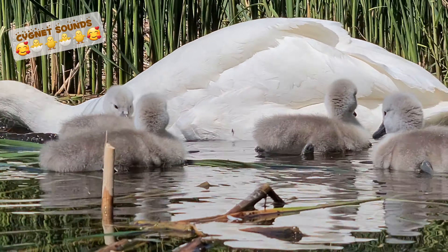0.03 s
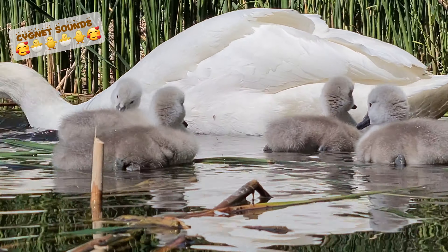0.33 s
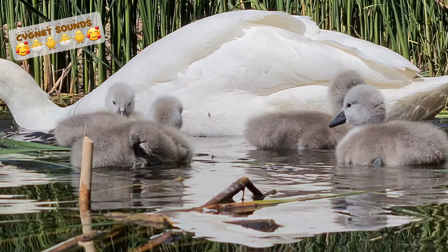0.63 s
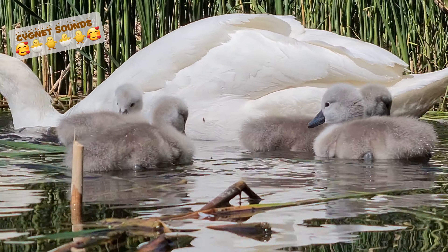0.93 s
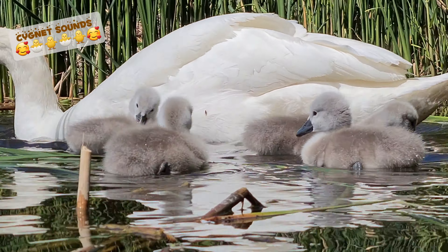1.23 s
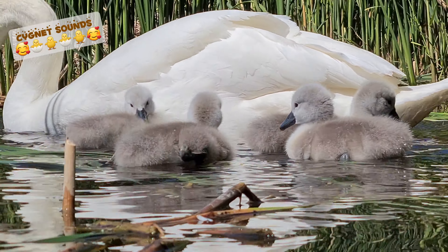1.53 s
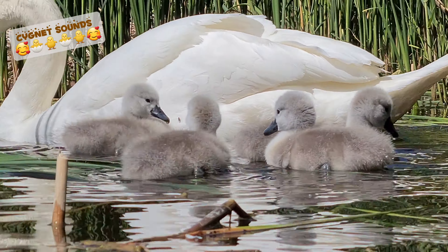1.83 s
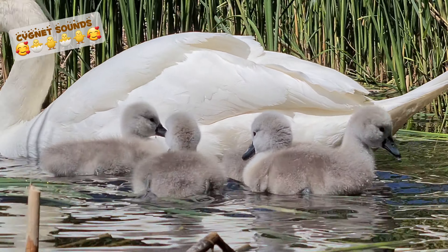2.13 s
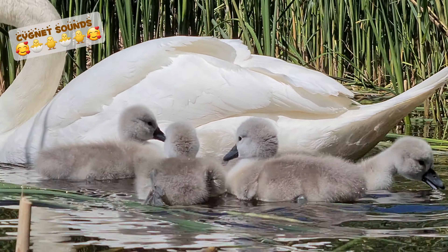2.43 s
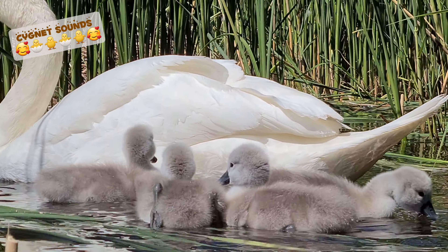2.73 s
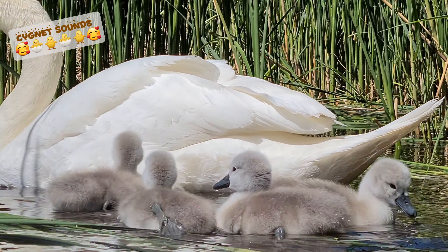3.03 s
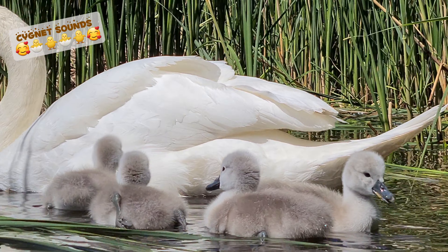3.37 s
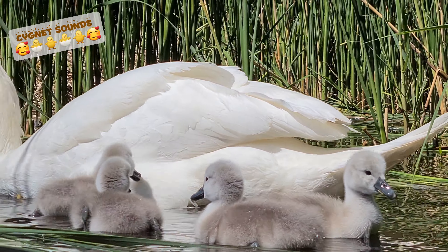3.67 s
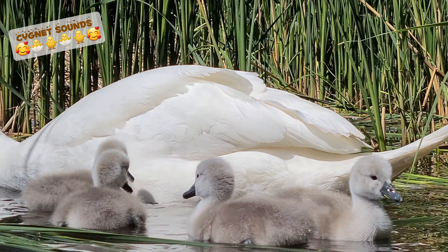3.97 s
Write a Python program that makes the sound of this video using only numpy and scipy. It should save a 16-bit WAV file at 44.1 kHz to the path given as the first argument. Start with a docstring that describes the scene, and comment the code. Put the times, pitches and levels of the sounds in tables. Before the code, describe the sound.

Cygnets paddle with light splashes and drips, then peep a few times over a low rumble.

```python
"""A deep outdoor rumble and a soft breeze hang over a reedy pond, where cygnets paddle.
A far bird repeats a falling note, heard only as echoes. Each foot stroke sloshes the water and
throws spray, droplets tick on the surface and small air bubbles ring; midway a foot splashes.
Near the end the chicks give a few short, whistled peeps. Reeds and banks scatter the near sounds."""
import sys
import numpy as np
from scipy import signal
from scipy.fft import rfft, irfft, next_fast_len
from scipy.io import wavfile
from scipy.ndimage import uniform_filter1d, map_coordinates

SR = 44100
rng = np.random.default_rng(int(sys.argv[2]) if len(sys.argv) > 2 else 0)


def digitize_waveform(pressure):
    """Quantize a signal to 16-bit integers and store it at the path in sys.argv[1].

    Rows of a 2-D input are taken as channels; values are limited to [-1, 1].
    """
    field = np.atleast_2d(pressure).T
    bounded = np.clip(field, -1, 1)
    quanta = np.round(bounded * 32767).astype(np.int16)
    wavfile.write(sys.argv[1], SR, quanta)


N = 176400

# stereo image of the water noises: freq_hz, correlation
WATER_CORRELATION = [(500, 0.9), (2000, 0.25), (4500, -0.66), (8000, -0.2), (13000, -0.42)]
WATER_LEFT_DB, BUBBLE_ATTACK_S, REEDS_T60_S = 6, 0.00034, 0.28


def amp(db):
    """Decibels to gain."""
    return 10 ** (np.asarray(db) / 20)


def unit(x):
    """Scale to rms 1."""
    return x / np.sqrt(np.mean(x ** 2) + 1e-20)


def clock():
    """The time of every sample, in seconds."""
    return np.arange(N) / SR


def along(points, hz):
    """Read (freq_hz, value) points on a log frequency axis."""
    freqs, values = np.transpose(points)
    return np.interp(np.log(hz + 1), np.log(freqs + 1), values)


def wobble(rate_hz, size=N):
    """A smooth random curve through rate_hz knots a second."""
    knots = rng.standard_normal(size // 4 + 4)[:int(size * rate_hz / SR) + 4]
    return map_coordinates(knots, [np.arange(size) * rate_hz / SR], mode="mirror")


def filtered(x, response):
    """Zero-phase EQ; response gives the gain at each frequency."""
    size = next_fast_len(N + SR // 2)
    return irfft(rfft(x, size) * response(np.fft.rfftfreq(size, 1 / SR)), size)[..., :N]


def noise(spectrum, correlation):
    """Coloured stereo noise of rms 1, its width set by the left-right correlation."""
    def mid_side_gains(hz):
        angle = np.arccos(np.clip(along(correlation, hz), -1, 1)) / 2
        return amp(along(spectrum, hz)) * [np.cos(angle), np.sin(angle)]
    mid, side = filtered(rng.standard_normal((2, N)), mid_side_gains)
    return unit(np.array([mid + side, mid - side]))


def pan(left_db):
    """Channel gains that put the left left_db above the right."""
    return amp(np.array([[left_db], [-left_db]]) / 2)


def fade(t, t60):
    """Exponential decay from t = 0, silent before."""
    return (t >= 0) * np.exp(-np.log(1000) * np.abs(t) / t60)


def echo(x, t60):
    """Diffuse scatter from reeds and banks, different on each side."""
    tail = rng.standard_normal((2, SR // 2)) * fade(np.arange(SR // 2) / SR, t60)
    return signal.fftconvolve(x[None], tail / np.linalg.norm(tail[0]), axes=1)[:, :N]


def rumble(evenness=0.92, drone_db=-42):
    """A deep, nearly mono rumble that swells and sinks around a steadier drone."""
    # tone of the rumble and of the drone: freq_hz, gain_db
    rumble_spectrum = [(20, -27), (31, -21.5), (37, -16.5), (44, -2.5), (54, 3), (62, -11.5), (75, -14),
                       (100, -40.5), (200, -97.5)]
    drone_spectrum = [(45, -42.5), (65, -2.5), (80, -3), (94, 2), (110, -4), (135, -11), (160, -11),
                      (200, -21), (300, -37.5), (600, -73)]
    # stereo image of both: freq_hz, correlation
    correlation = [(50, 1), (100, 0.99), (200, 0.98)]
    # swells and dips of the rumble: time_s, level_db
    swells = [(0.0, -33.5), (0.12, -34.5), (0.17, -42), (0.19, -33), (0.43, -33.5), (0.47, -46),
              (0.53, -30.5), (0.97, -35.5), (1.06, -27), (1.27, -38.5), (1.45, -31.5), (1.51, -47),
              (1.59, -25.5), (1.64, -39.5), (2.37, -27.5), (2.53, -40.5), (2.6, -29), (2.66, -29),
              (2.7, -44), (2.92, -28.5), (3.05, -41), (3.11, -30.5), (3.2, -37.5), (3.64, -27.5),
              (3.71, -35.5), (3.75, -23), (3.81, -38.5), (3.84, -28.5), (3.95, -35), (4.0, -44)]
    low = noise(rumble_spectrum, correlation)
    envelope = np.sqrt(np.abs(uniform_filter1d(low[0] ** 2, size=2600)) + 1e-6)
    levelled = unit(low / envelope ** evenness)  # irons out the noise's own surges
    deep = levelled * amp(np.interp(clock(), *np.transpose(swells)))
    return deep + amp(drone_db) * noise(drone_spectrum, correlation)


def breeze(level_db=-51, left_db=0.56):
    """Soft, nearly steady air over the pond."""
    # tone of the air: freq_hz, gain_db
    spectrum = [(30, -33), (150, 3), (260, 3), (400, -2), (650, 0.5), (850, -1.5), (1100, 2), (1500, -7),
                (2000, -10), (2500, -17), (3500, -21.5), (4600, -28.5), (5800, -36.5), (7200, -35.5),
                (8200, -47), (10500, -42), (12000, -38), (15500, -44)]
    # its stereo image: freq_hz, correlation
    correlation = [(100, 0.48), (250, 0.84), (500, 0.29), (1000, -0.36), (1500, -0.42), (2200, 0.078),
                   (4000, -0.14), (8000, -0.21), (14000, -0.19)]
    # one gentle swell: time_s, gain_db
    swell = [(0, 1), (.8, 1.04), (1.5, 0.5), (2.1, 3.5), (2.6, 0), (3.3, 0), (4, -0.7)]
    level = amp(level_db + np.interp(clock(), *np.transpose(swell)))
    return noise(spectrum, correlation) * level * pan(left_db)


def paddling(slosh_grain_db=2.5, spray_grain_db=6, gurgle_db=-8, slosh_left_db=4.0):
    """Each foot stroke pushes gurgling water aside and throws grainy spray and fine mist."""
    # foot strokes, rising and falling tenfold: peak_s, rise_s, fall_s, slosh_db, spray_db, mist_db
    strokes = [(.25, 0.52, 0.17, -71.5, -77, -87.5), (0.498, 0.084, 0.17, -71.5, -70.5, -78.5),
               (1.08, 0.024, 0.042, -63, -76, -82), (1.415, 0.11, 0.21, -59.5, -78, -69),
               (1.81, 0.23, 0.26, -65, -71.5, -77), (1.925, 0.013, 0.024, -48.5, -52.5, -52.5),
               (1.981, 0.076, 0.044, -50.5, -58, -57), (2.202, 0.15, 0.18, -56.5, -78, -73.5),
               (2.591, 0.13, .12, -63, -68, -74), (3.22, 0.014, 0.039, -56.5, -80, -70.5),
               (3.67, 0.024, 0.046, -57.5, -74.5, -83)]
    # tone of the three layers, dark to bright: freq_hz, gain_db
    slosh_spectrum = [(200, -12.5), (600, 12), (1200, 10.5), (1900, 4.5), (3300, 9), (4800, -18.5),
                      (6000, -37.5), (12000, -14)]
    spray_spectrum = [(300, -25.5), (1500, -10.5), (3000, 3), (5000, 4.5), (6000, 1), (7300, 2),
                      (8500, -7.5), (10000, -4), (12000, -16.5), (15500, -26)]
    mist_spectrum = [(5000, -26.5), (8000, -13.5), (10000, 1), (11000, -5.5), (14000, -7), (15700, 1)]

    def grainy(spectrum, depth_db, rate_hz):
        return noise(spectrum, WATER_CORRELATION) * amp(depth_db * wobble(rate_hz))

    t, levels = clock(), np.zeros((3, N))
    for peak_s, rise_s, fall_s, *layer_db in strokes:
        levels += amp(layer_db)[:, None] * 10 ** -np.maximum((peak_s - t) / rise_s, (t - peak_s) / fall_s)
    slosh = levels[0] * unit(grainy(slosh_spectrum, slosh_grain_db, 150) + amp(gurgle_db) * gurgle())
    spray = levels[1] * unit(grainy(spray_spectrum, spray_grain_db, 600))
    mist = levels[2] * unit(grainy(mist_spectrum, spray_grain_db, 600))
    return (spray + mist) * pan(WATER_LEFT_DB) + slosh * pan(slosh_left_db)


def gurgle(count=2400, centre_hz=2937, spread=0.25, ring_cycles=71, scatter_db=4.0):
    """A swarm of tiny bubbles ringing at random times and pitches, rms 1."""
    when, where = rng.random((2, count, 1))
    detune, strength = rng.standard_normal((2, count, 1))
    hz = centre_hz * np.exp(spread * detune)
    t = np.arange(SR // 40) / SR
    samples = ((when * N).astype(int) + np.arange(len(t))).ravel()
    envelope = amp(scatter_db * strength) * fade(t, ring_cycles / hz) * (1 - np.exp(-t / BUBBLE_ATTACK_S))
    # a phase lag on the right spreads the swarm in stereo
    sides = [envelope * np.sin(2 * np.pi * hz * t - lag) for lag in (0, np.pi * where)]
    return unit(np.array([np.bincount(samples, side.ravel(), N)[:N] for side in sides]))


def far_bird(top_hz=4556, end_hz=3020, length_s=0.17, warble=0.13, left_db=5):
    """A falling, warbled note heard only through its echoes."""
    # the bird's calls: start_s, level_db
    notes = [(0.199, -65), (0.719, -66), (1.31, -62), (1.981, -63), (2.498, -63), (3.521, -72)]
    song = np.zeros(N)
    for start_s, level_db in notes:
        progress = np.clip((clock() - start_s) / length_s, 0, 1)
        pitch = (top_hz + (end_hz - top_hz) * progress) * (1 + warble * wobble(250))
        arch = np.sqrt(2 * np.abs(np.sin(np.pi * progress)))
        song += amp(level_db) * arch * np.sin(2 * np.pi * np.cumsum(pitch) / SR)
    return echo(song, t60=0.49) * pan(left_db)


def droplets(rise_s=0.0028, tick_t60_s=0.0058, fizz_db=-27, fizz_t60_s=0.15):
    """Drops hit the surface with a bright tick and a short fizz."""
    # drop impacts: peak_s, level_db
    drops = [(0.334, -55.5), (.471, -55.5), (0.547, -56.5), (0.638, -61.5), (0.731, -66), (1.063, -59.5),
             (1.077, -62.5), (1.36, -58), (1.389, -54.5), (1.404, -59.5), (1.432, -54.5), (1.5, -59.5),
             (1.528, -54.5), (1.597, -61), (1.619, -58.5), (1.673, -62.5), (1.738, -58.5), (1.824, -63),
             (1.89, -44), (1.919, -44.5), (2.374, -59.5), (2.95, -64), (3.154, -59), (3.2128, -50.5),
             (3.312, -62.5)]
    # tone of an impact: freq_hz, gain_db
    spectrum = [(500, -11.5), (2500, 9), (5000, 2), (7000, 9), (9000, -4.5), (13000, 5.5), (16000, -7.5)]
    level = np.zeros(N)
    for peak_s, level_db in drops:
        t = clock() - peak_s
        tick = fade(-t, rise_s) + fade(t, tick_t60_s)
        level += amp(level_db) * (tick + amp(fizz_db) * fade(t, fizz_t60_s))
    return level * noise(spectrum, WATER_CORRELATION) * pan(WATER_LEFT_DB)


def bubbles(typical_hz=5000, rise_per_t60=0.018, quiver_depth=0.07, right_lag_s=0.00007):
    """Each bubble rings briefly and rises in pitch; small ones start faster and quiver more."""
    # single ringing bubbles: start_s, pitch_hz, level_db, t60_s, left_db
    plinks = [(0.336, 7200, -59.5, 0.0097, 24), (0.47, 4350, -41, 0.0078, 12.5),
              (.591, 3820, -49.5, 0.014, 0), (0.638, 6550, -52, 0.0071, 12.5),
              (1.353, 6400, -52, 0.0098, 9), (1.391, 3430, -48, 0.07, 7.5), (1.432, 6470, -56, .012, 7),
              (1.4437, 1140, -32.5, 0.075, 1), (1.5, 5180, -48.5, .014, 7), (1.53, 2900, -55, 0.069, 3),
              (1.555, 9730, -59, 0.014, 7), (1.596, 4000, -50.5, 0.048, 15), (1.675, 12100, -55, 0.0073, 4),
              (1.7398, 4520, -35, 0.0087, 5), (1.7398, 5600, -35, 0.0043, 8), (1.753, 4880, -41, .012, 10),
              (1.765, 5400, -43, .006, 9), (1.786, 4580, -42, 0.0067, 10), (1.807, 6520, -58, 0.015, 16),
              (1.8882, 4400, -30, 0.0034, 10), (1.923, 7600, -36, 0.0054, 12),
              (1.926, 1914, -36.5, 0.031, 0), (1.951, 7440, -47, .008, 7),
              (1.988, 10000, -37.5, 0.0084, -2), (2.187, 3060, -55, .03, 2),
              (2.23, 2773, -47.5, 0.072, 5.5), (2.303, 3640, -56.5, .025, 15),
              (3.155, 3140, -38.5, 0.0046, 15.5), (3.435, 4640, -58.5, 0.01, 11),
              (3.675, 5000, -57.5, 0.023, 8)]
    out = np.zeros((2, N + SR))
    size = SR // 5
    t = np.maximum(np.arange(size) / SR - np.array([[0], [right_lag_s]]), 0)
    for start_s, pitch_hz, level_db, t60_s, left_db in plinks:
        smallness = pitch_hz / typical_hz
        quiver = quiver_depth * np.sqrt(smallness) * np.cumsum(wobble(0.39 * pitch_hz, size)) / SR
        cycles = pitch_hz * (t * (1 + rise_per_t60 * t / t60_s / 2) + quiver)
        attack = 1 - np.exp(-t * smallness / BUBBLE_ATTACK_S)
        ring = np.sin(2 * np.pi * cycles) * fade(t, t60_s) * attack
        at = round(start_s * SR)
        out[:, at:at + size] += amp(level_db) * pan(left_db) * ring
    return out[:, :N]


def peeps(jitter=0.0078, flutter_db=1.5, octave_left_db=4, right_lag_s=0.00003, wet_db=-15):
    """The chicks' short gliding whistles with a fluttering octave, coloured by the throat."""
    # one contour for each peep: time_s, pitch_hz, level_db
    contours = [
        [(2.915, 2140, -58), (2.927, 2140, -44.5), (2.943, 2100, -44.5), (2.957, 1906, -49.5),
         (2.965, 1780, -68)],
        [(3.112, 2265, -51), (3.12, 2540, -57), (3.132, 2505, -50), (3.168, 2165, -41), (3.18, 1913, -45),
         (3.188, 1780, -62)],
        [(3.665, 2730, -69.5), (3.678, 2570, -72), (3.705, 2070, -74)],
        [(3.904, 1517, -66), (3.914, 1630, -48.5), (3.946, 2013, -41.5), (3.97, 2230, -46), (3.982, 2310, -50),
         (3.99, 2300, -44.5), (3.998, 1800, -48)],
    ]
    # each peep's octave against its fundamental, ahead of the throat: octave_db
    octave_levels = [-30, -28, -1, -18.5]
    # resonances of throat and bill: freq_hz, gain_db
    throat = [(1500, 3), (2300, -3), (3300, -2.5), (4000, -3), (4550, 1.5), (5100, -8), (7000, -12)]
    t, whistles = clock(), np.zeros((2, N))
    for contour, octave_db in zip(contours, octave_levels):
        time_s, pitch_hz, level_db = np.transpose(contour)
        pitch = np.interp(t, time_s, pitch_hz) * (1 + jitter * wobble(400))
        phase = 2 * np.pi * (np.cumsum(pitch) / SR - np.outer([0, 1], pitch * right_lag_s))
        gate = (t > time_s[0]) * (t < time_s[-1])
        level = amp(np.interp(t, time_s, level_db) + flutter_db * wobble(150))
        envelope = uniform_filter1d(level * gate, size=90)  # softens the edges
        octave = amp(octave_db + 2.4 * wobble(120)) * pan(octave_left_db) * np.sin(2 * phase)
        whistles += np.sqrt(2) * envelope * (np.sin(phase) + octave)
    voice = filtered(whistles, lambda hz: amp(along(throat, hz)))
    return voice + amp(wet_db) * echo(voice.mean(0), REEDS_T60_S)


def scene(water_wet_db=-6):
    """Water and chicks in front, the landscape behind."""
    water = bubbles() + droplets() + paddling()
    reeds = amp(water_wet_db) * echo(water[0], REEDS_T60_S)
    return water + reeds + peeps() + far_bird() + breeze() + rumble()


def record(dry):
    """A brick-wall low-pass trims the very top of the treble."""
    return filtered(dry, lambda hz: hz < 15750)


dry = scene()
out = record(dry)
digitize_waveform(out)
```